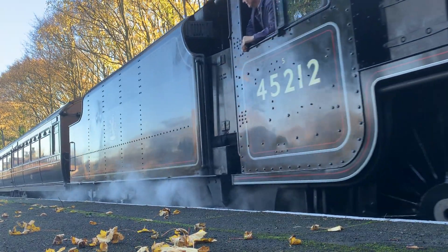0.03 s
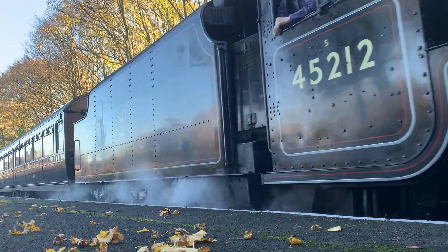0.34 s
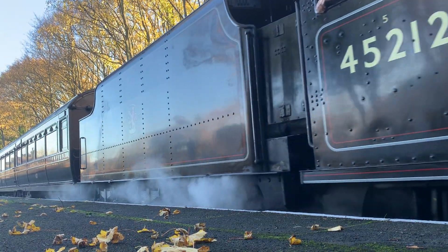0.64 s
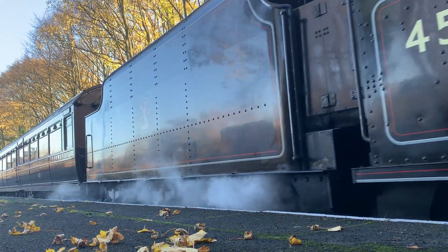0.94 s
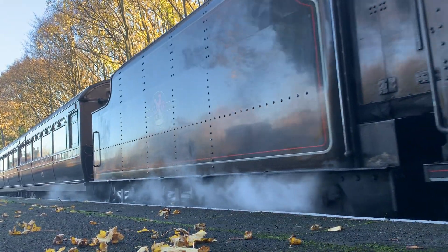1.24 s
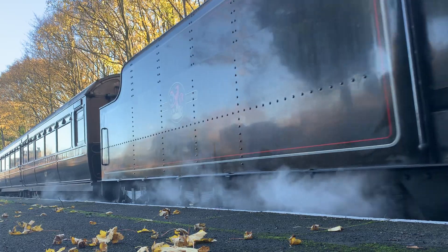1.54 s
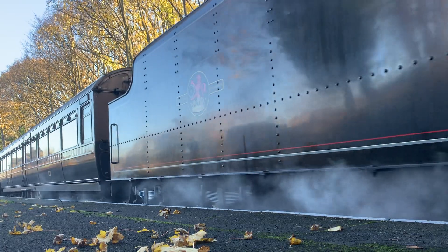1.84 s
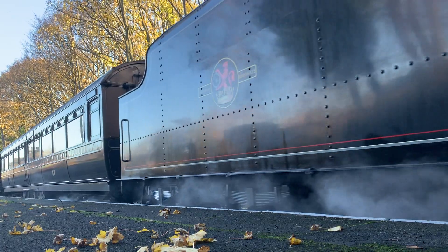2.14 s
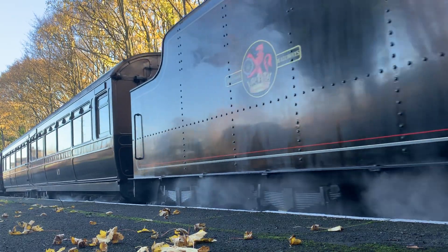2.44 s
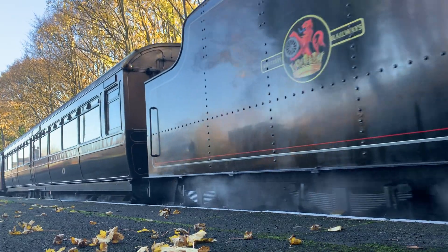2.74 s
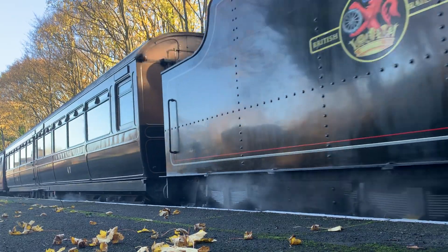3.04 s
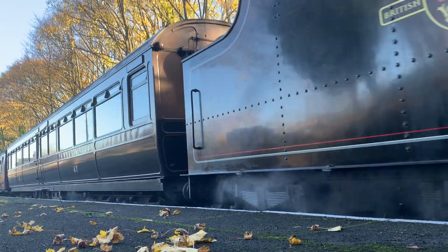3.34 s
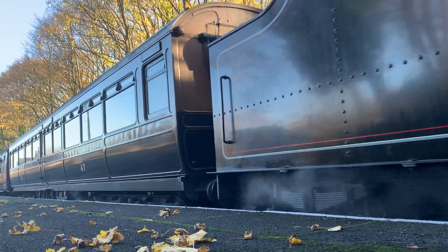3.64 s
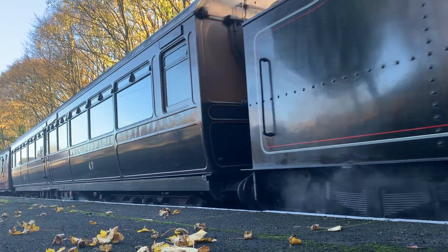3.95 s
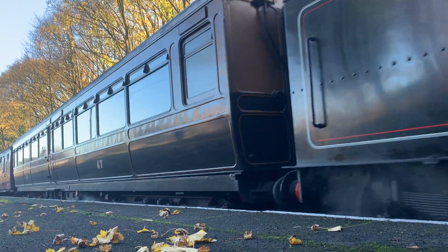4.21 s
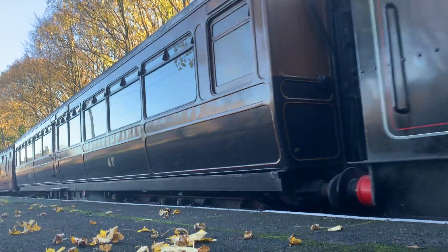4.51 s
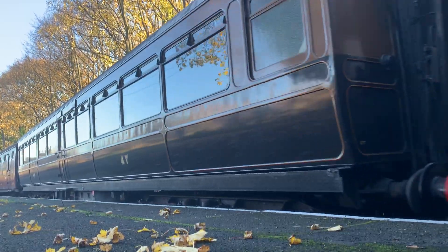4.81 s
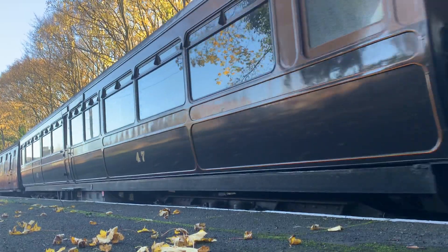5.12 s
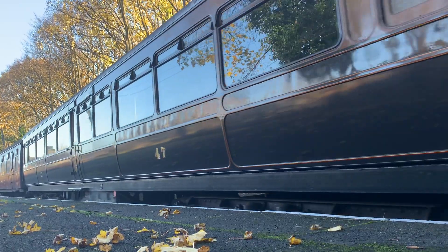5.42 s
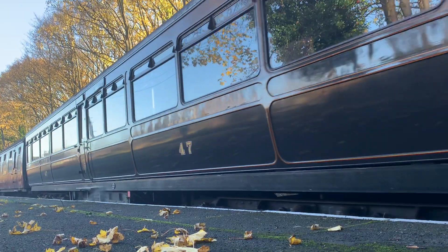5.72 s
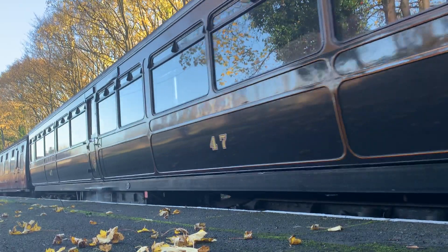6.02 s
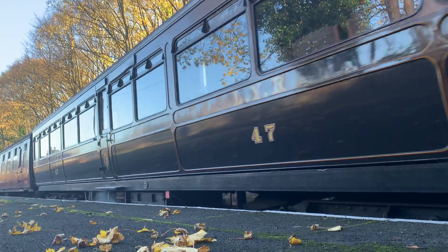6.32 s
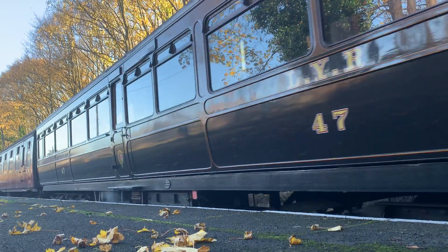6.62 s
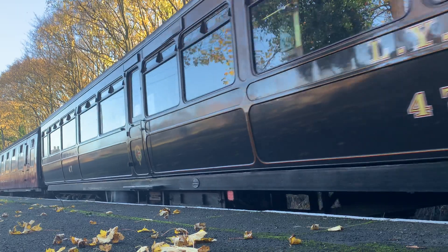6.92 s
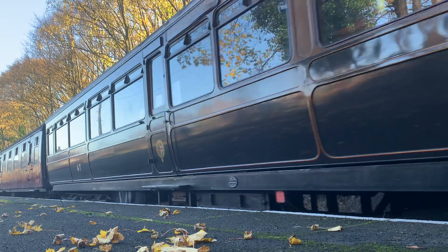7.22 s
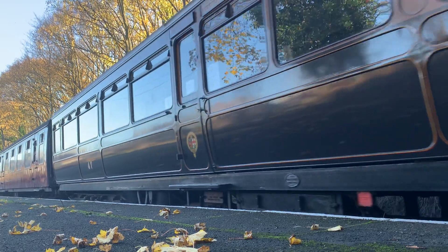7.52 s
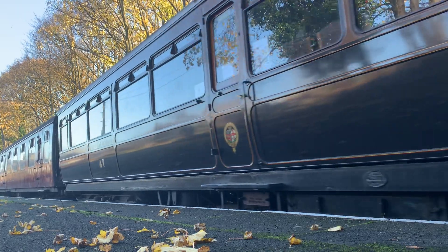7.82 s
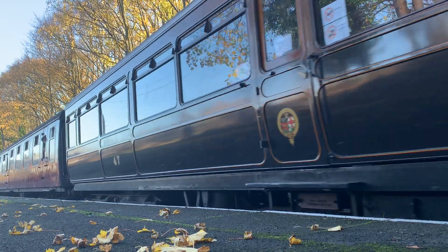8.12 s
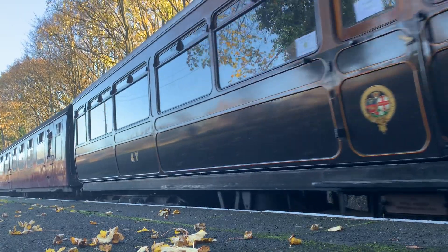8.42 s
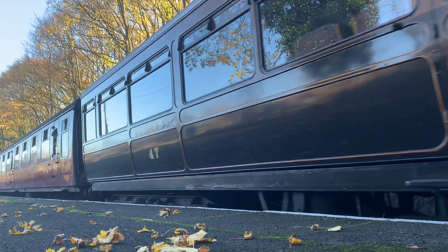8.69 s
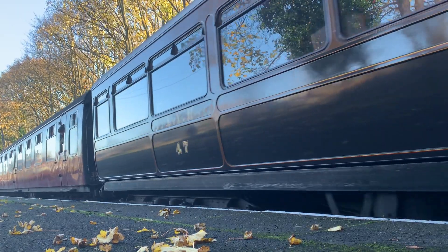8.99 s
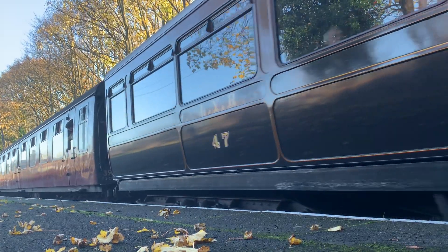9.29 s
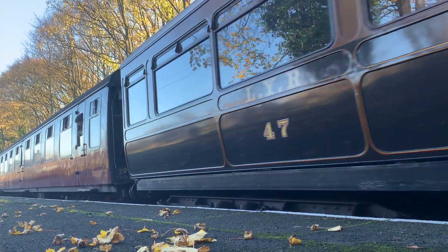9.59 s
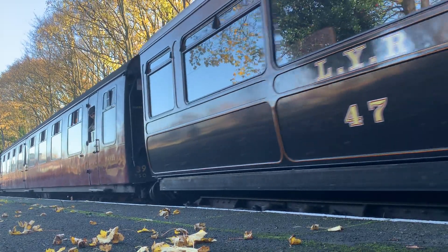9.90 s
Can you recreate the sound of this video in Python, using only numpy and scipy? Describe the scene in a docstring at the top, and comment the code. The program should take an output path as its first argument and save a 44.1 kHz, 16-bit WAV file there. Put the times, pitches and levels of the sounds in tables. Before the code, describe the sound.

A steam locomotive pulls past a microphone low on an outdoor platform, its deep, hollow chuffs gradually quickening and dulling as it moves away. Steam hisses strongly at first, then fades. Heavy wheels rumble throughout, with several steel clanks in the first half. Toward the end, the carriage wheels give short, high squeaks and a spring groans briefly.

```python
"""Steam locomotive leaving a station

The engine draws its carriages close past a listener low on the platform. Exhaust beats, turbulent
jets through the chimney, quicken as it moves away; leaking steam hisses by and fades behind the tender.
Wheels rumble, the running gear knocks, the first carriage's wheels squeak as steel slips on steel,
a spring groans, and the trees throw the beats back."""
import sys
import numpy as np
from scipy import signal
from scipy.fft import rfft, irfft, next_fast_len
from scipy.io import wavfile
from scipy.ndimage import uniform_filter1d, minimum_filter1d

SR = 44100
rng = np.random.default_rng(int(sys.argv[2]) if len(sys.argv) > 2 else 0)


def to_wav(s):
    """Save 16-bit WAV."""
    ch = np.atleast_2d(s).T  # columns
    pcm = np.round(np.clip(ch, -1, 1) * 32767)  # PCM
    wavfile.write(sys.argv[1], SR, pcm.astype(np.int16))


N = 438794
TIME = np.arange(N) / SR
HZ = np.fft.rfftfreq(N, 1 / SR)


# Chimney blast spectrum: f/Hz, density/dB
BLAST_SPECTRUM = [(25, -17), (40, -5), (65, 2), (130, -1.5), (260, -10.5), (450, -10.5), (620, -15.5),
                  (900, -10), (1600, -19), (2100, -22), (3000, -28), (4200, -31.5), (6500, -34.5),
                  (9500, -39.5)]
# Chimney and smokebox resonances and dips: f/Hz, width/Hz, lift/dB
CHIMNEY_MODES = [(68.3, 4, 5), (156, 22, -1), (214.5, 41, 8.5), (268, 20, 0), (313, 13.8, 8.5),
                 (393, 37, 4), (1230, 70, -1), (1410, 170, -4)]
# Exhaust beats: t/s, valve open/s, push/dB, thump/dB, bark/dB, rasp/dB,
# then f/Hz, lift/dB for each of four hollow notes (boom, low, middle, high)
EXHAUST_BEATS = [(-0.13, .14, -24.5, -21, -17, -25, 210, 3, 480, 10, 717, 22, 1230, 13),
                 (0.683, 0.11, -30, -17.5, -12, -24, 198, 5.5, 307, 6, 490, 8.5, 1180, 7),
                 (1.493, .14, -16, -17, -10, -22, 218, 3.5, 500, 7, 712, 4, 1240, 8),
                 (2.221, 0.13, -19.5, -19.5, -13, -21.5, 216, -2, 513, 7, 812, 5.5, 1765, 8.5),
                 (2.895, .15, -29.5, -20.5, -14.5, -29, 308.4, 8, 439, 7.5, 690, 13.5, 1644, 12.5),
                 (3.537, 0.1, -30.5, -14.5, -12.5, -23.5, 216, 5.5, 445, 10, 693, 9.5, 1247, 14.5),
                 (4.189, .11, -41, -21, -14, -26.5, 200, 8, 425, 12.5, 541, 9, 1300, 0),
                 (4.779, 0.14, -16, -20.5, -11.5, -24.5, 215.5, 9, 538, 7.5, 1030, 12, 1410, 12),
                 (5.357, .12, -22, -20, -15.5, -29.5, 221, 5.5, 300, 6, 398, 7.5, 1249, 3),
                 (5.914, .12, -23, -14.5, -14, -28.5, 217, 0, 508, 6, 707, 11, 1460, 12),
                 (6.482, 0.15, -26.5, -23, -16.5, -30.5, 201, -2.5, 483, 12, 719, 5.5, 1250, 6.5),
                 (7.009, .13, -15, -21, -12, -26.5, 216, -4, 460, 2, 903, 11, 1690, 7),
                 (7.518, .12, -24, -25.5, -16.5, -32.5, 216, 9.5, 410, 9, 799, -9, 1860, 6),
                 (8.021, .12, -17, -24, -13.5, -30, 215.4, 9, 326, 8, 720, 3, 1270, 12.5),
                 (8.526, .13, -21.5, -25, -16, -30.5, 213, 10.5, 392, 6.5, 711, 10, 1715, 7.5),
                 (8.999, .15, -20.5, -23, -14, -30.5, 216, 5, 242, 5, 724, 7.5, 2100, 6.5),
                 (9.456, .13, -17, -19.5, -19, -35, 217, 6, 393, -3, 712, 1, 1190, 4),
                 (9.91, 0.11, -12, -15.5, -21, -32, 198, 4, 358, 0, 710, 23.5, 1230, 2)]

def exhaust():
    """Turbulent chimney jet: a thump leads, then hollow bark, crackling rasp, bite and a deep push."""
    push_db, thump_db, bark_db, rasp_db = np.transpose(EXHAUST_BEATS)[2:6]
    modes_db = sum(db / (1 + (2 * (HZ - hz) / width_hz) ** 2) for hz, width_hz, db in CHIMNEY_MODES)
    colour = gain(spectrum_at(BLAST_SPECTRUM, HZ) + modes_db)
    # steadied so each beat's low push keeps its set strength
    push = steadied(noise(colour * band(32, 73)), amount=.55)
    thump = steadied(noise(colour * band(74.3, 150)), amount=.44)
    bark = bark_noise(colour)
    eddies = gain(1.14 * wander(130))
    rasp = unit_rms(noise(colour * band(1050, 1810)) * eddies)
    bite = unit_rms(noise(colour * band(1500, 4560)) * eddies)
    spray = unit_rms(noise(colour * band(2760, 7800)) * eddies)
    crack = unit_rms(noise(colour * band(1600, 3300)) * eddies ** 2)
    hard_beat = np.arange(len(EXHAUST_BEATS)) % 4 == 3  # once per wheel turn
    crack_db = np.where(hard_beat, rasp_db - 3.5, -120)
    push *= puffs(push_db, rise_s=.038, rise_power=.5, hold=1.11, sag_db=-3, t60_s=.35)
    thump *= puffs(thump_db, rise_s=.044, rise_power=.99, hold=1.13, sag_db=.8, t60_s=.35, lead_s=.009)
    bark *= puffs(bark_db - 1.25, rise_s=.054, rise_power=1.16, hold=.9, sag_db=1.5, t60_s=.42)
    rasp *= puffs(rasp_db + 1, rise_s=.075, rise_power=1.13, hold=.71, sag_db=-1, t60_s=.39)
    bite *= puffs(rasp_db - 2, rise_s=.056, rise_power=1.2, hold=.85, sag_db=5.5, t60_s=.28)
    spray *= puffs(rasp_db - .5, rise_s=.054, rise_power=1, hold=.9, sag_db=8, t60_s=.078)
    crack *= puffs(crack_db, rise_s=.048, rise_power=2, hold=.48, sag_db=0, t60_s=.16)
    return push + thump + bark + rasp + bite + crack + spray * gain(-1.47 * TIME)


def bark_noise(colour):
    """Hollow middle of the blast; dulls as the chimney moves away."""
    jet = noise(colour * band(134, 775))
    low = filtered(jet, band(1, 300))
    upper = steadied(jet - low, amount=.55, samples=2200)
    return steadied(low, amount=1, samples=2200) + upper * gain(2 - .33 * TIME)


def puffs(levels_db, rise_s, rise_power, hold, sag_db, t60_s, lead_s=0):
    """Beat envelopes: swell as the valve opens, sag for hold x its open time, die as it shuts."""
    power = np.zeros(N)
    for (beat_s, open_s, *_), db in zip(EXHAUST_BEATS, levels_db):
        start_s, held_s = beat_s - lead_s, hold * open_s
        active = (TIME > start_s) & (TIME < start_s + 1)
        t = TIME[active] - start_s
        swell = np.minimum(t / rise_s, 1) ** rise_power
        tilt_db = sag_db * (.5 - np.minimum(t / held_s, 1))
        decay_db = 60 * np.maximum(t - held_s, 0) / t60_s
        power[active] += (swell * gain(db + tilt_db - decay_db)) ** 2
    return np.sqrt(power)


def hollow_notes(blast, widths_hz=(18, 22, 24, 36), hold_s=.025, fade_s=.015):
    """Adds the ring between boiler, platform and bank: new notes each beat as the engine moves on."""
    start_s, open_s, *notes = np.array(EXHAUST_BEATS)[latest_row(EXHAUST_BEATS)].T
    overrun_s = TIME - start_s - open_s - hold_s
    drive = blast / (1 + np.exp(np.clip(overrun_s / fade_s, -40, 40)))
    return blast + sum((gain(lift_db) - 1) * resonate(drive, hz, width_hz)
                       for hz, lift_db, width_hz in zip(notes[::2], notes[1::2], widths_hz))


def train_reflections(x, share=.35, max_delay_s=.022, paths=5):
    """Adds reflections off the moving train: new paths each beat comb the sound above the bass."""
    upper, out = filtered(x, band(300, 20000)), x.copy()
    for delays_s in rng.uniform(.0947, 1, (paths, len(EXHAUST_BEATS))) * max_delay_s:
        emitted_s = TIME - delays_s[latest_row(EXHAUST_BEATS)]
        out += share * np.array([np.interp(emitted_s, TIME, side) for side in upper])
    return out


# Leak passing and leaving: t/s, level at 4-7 kHz/dB
LEAK_LEVEL = [(0.15, -33), (1.3, -32.5), (3.3, -38.5), (5.2, -42), (6.85, -47), (7.88, -51), (9.8, -56)]
# Spectra of the leak's hiss and top fizz: f/Hz, density/dB
HISS_SPECTRUM = [(150, -17), (500, 2.5), (800, 4), (1300, 2.5), (2200, 2.5), (3100, -3), (4000, -4.5),
                 (5500, -3), (7000, -6), (8400, -8.5), (10000, -15.5)]
FIZZ_SPECTRUM = [(7000, -30), (8500, -4), (9500, 0), (11000, -4), (13500, -8), (15200, -11)]

def steam_leak():
    """Steam sputters from under the cab; the top fizz is lost as it moves off."""
    steam = noise(gain(spectrum_at(HISS_SPECTRUM, HZ)), rms_band=band(3580, 7520))
    body = patchy(filtered(steam, band(100, 3300)), depth_db=2.1, bins=6, frames=9)
    edge = patchy(filtered(steam, band(3300, 8600)), depth_db=1.3, bins=10, frames=14)
    thinning_db = 3.4 * np.exp(-TIME / 2)  # while the jet faces the platform
    sputter_db = .5 * wander(25) + .6 * wander(200)
    body *= gain(sputter_db - thinning_db)
    fizz = noise(gain(spectrum_at(FIZZ_SPECTRUM, HZ)) * band(5800, 20000)) * gain(-8.5 - 2.6 * TIME)
    flutter_db = .3 * wander(11)
    return (body + edge + fizz) * gain(timeline(LEAK_LEVEL) - leak_dip_db() + flutter_db)


def leak_dip_db(depth_db=5, delay_s=.24, width_s=.088, until_s=2.85):
    """While the engine is near, the leak slackens after each beat empties a cylinder."""
    dips = sum(np.exp(-((TIME - beat_s - delay_s) / width_s) ** 2)
               for beat_s, *_ in EXHAUST_BEATS if beat_s > 0)
    return depth_db * dips / (1 + (TIME / until_s) ** 10)


# Rolling train, loudest as wheels pass: t/s, rumble/dB, roar/dB
ROLLING_LEVELS = [(.15, -24, -27), (.42, -21.5, -26.5), (.95, -30, -28), (1.4, -35, -30), (2.1, -25, -32.5),
                  (3.8, -28.5, -30.5), (4.08, -20, -31.5), (4.55, -27.5, -30.5), (6.4, -25, -35),
                  (7.4, -23.5, -30.5), (8.3, -29, -32), (9.85, -28, -31.5)]
# Spectra of track rumble and wheel roar: f/Hz, density/dB
RUMBLE_SPECTRUM = [(10, -27), (25, -18), (40, -5.5), (58, 10), (72, 1.5), (95, 6.5), (130, -19),
                   (200, -19.5), (400, -68)]
ROAR_SPECTRUM = [(70, 5.5), (150, 2), (230, 1), (430, -3.5), (620, -10), (1000, -13.8), (1600, -19),
                 (2600, -26), (4500, -34), (9000, -93)]

def rolling_wheels():
    """Heavy wheels shake the track and roar unevenly on the rails."""
    shake = noise(gain(spectrum_at(RUMBLE_SPECTRUM, HZ)))
    sprung = np.tanh(.3 * shake)  # springs even out the biggest surges
    rumble = unit_rms(filtered(sprung, band(12, 156))) * gain(timeline(ROLLING_LEVELS))
    roar = noise(gain(spectrum_at(ROAR_SPECTRUM, HZ)) * band(36, 8000), rms_band=band(200, 900))
    roar = patchy(roar, depth_db=1.8, bins=3, frames=20)
    roar_db = timeline(ROLLING_LEVELS, column=2) - 1.5 + .15 * wander(12.5)
    return rumble + roar * gain(roar_db)


# Steel frame resonances: f/Hz, width/Hz, level/dB
FRAME_MODES = [(230, 62, 1), (410, 47, 8), (543, 35, 8), (670, 32, 8.5), (950, 11, 11), (1220, 470, -0.5),
               (2200, 1500, -16.5)]
# Running gear knocks: t/s, level/dB, strongest ring/Hz
GEAR_KNOCKS = [(0.312, -26, 1080), (0.559, -22.5, 520), (1.729, -27, 378), (2.075, -31, 860),
               (2.557, -29.5, 385), (4.001, -30, 950), (4.42, -36, 655), (7.29, -39, 960)]

def gear_knocks(rise_s=.009, t60_s=.29, clack_s=.022):
    """Slack in rods and couplings closes: a steel clack, then the frames rattle, most on one note."""
    frame_power = sum(gain(2 * db) / (1 + (2 * (HZ - hz) / width_hz) ** 2)
                      for hz, width_hz, db in FRAME_MODES)
    blows, contact = np.zeros((2, N))
    for start_s, db, _ in GEAR_KNOCKS:
        t = TIME - start_s
        blows += np.clip(t / rise_s, 0, 1) * gain(db - 60 * np.maximum(t, 0) / t60_s)
        contact += (t > 0) & (t < clack_s)
    rattle = gain(4.5) * noise(np.sqrt(frame_power) * band(130, 3700)) * blows
    clack = gain(-2.5) * noise(band(1300, 3200)) * blows * uniform_filter1d(contact, size=90)
    ring_hz = np.array(GEAR_KNOCKS)[latest_row(GEAR_KNOCKS), 2]
    return clack + rattle + gain(-1) * resonate(rattle, ring_hz, width_hz=45)


# Carriage wheel squeaks: t/s, length/s, f/Hz, glide/share of f, level/dB, roughness/share of f
WHEEL_SQUEAKS = [(6.36, 0.069, 9000, -.011, -66, .008), (6.84, .08, 6760, 0, -58, .006),
                 (6.88, .09, 9200, .02, -63, .015), (7.42, .049, 8340, .04, -55, .012),
                 (7.445, .074, 9200, .014, -61, .01), (7.9, .12, 8900, 0, -54, 0.014),
                 (8.16, .15, 8280, -.015, -51, .009), (8.2, .09, 9200, .03, -70, .012),
                 (8.318, 0.082, 7600, 0.068, -47, 0.04), (8.372, 0.054, 8700, 0.074, -55, 0.018),
                 (8.418, .04, 9900, 0.21, -56, .008), (8.74, 0.032, 9150, .06, -48, .006),
                 (8.765, .028, 9400, .06, -48, .006), (8.79, 0.036, 8280, -0.0022, -46, 0.0054),
                 (8.822, 0.035, 9250, .05, -54, .008), (8.825, 0.048, 8300, 0, -48, .006),
                 (8.85, .028, 9600, 0.091, -54, .006), (8.872, 0.031, 9300, .01, -57, .012),
                 (8.955, .052, 9050, .08, -51, .0045), (9.195, 0.052, 8270, -0.023, -44, 0.025),
                 (9.226, 0.046, 8100, .13, -35.5, .018), (9.254, 0.022, 6780, 0, -40, .005),
                 (9.262, 0.044, 8330, .01, -50, .01), (9.25, .15, 9140, -0.081, -55.5, .013),
                 (9.37, .035, 11150, 0, -65, .004), (9.666, 0.036, 8830, .025, -43, .016),
                 (9.69, 0.044, 7770, -0.0087, -36, .008), (9.708, .03, 8500, -.05, -53, .04),
                 (9.732, 0.056, 7940, .018, -48, .008)]

def wheel_squeaks():
    """Carriage wheels sing and squeak on the rail; the trees answer."""
    squeal = flange_squeal() + stick_slip(WHEEL_SQUEAKS)
    return gain(1.5) * squeal + gain(-9) * tree_echoes(squeal)


def stick_slip(rows):
    """Steel sticks and slips on steel: short, unsteady glides."""
    out = np.zeros((2, N))
    jitter, grip = wander(650), gain(2.2 * wander(130))
    for start_s, length_s, centre_hz, glide, db, roughness in rows:
        at = np.flatnonzero((TIME > start_s) & (TIME < start_s + length_s))
        hz = centre_hz * (1 + glide * np.linspace(-.5, .5, len(at))) * (1 + roughness * jitter[at])
        envelope = gain(db) * grip[at] * signal.windows.tukey(len(at), .6)
        out[:, at] += np.sqrt(2) * sine_pair(hz) * envelope
    return out


# Flange contact: t/s, level/dB
FLANGE_LEVEL = [(4.3, -75), (5.2, -63), (6.5, -63), (7.6, -66), (8.3, -62), (9.3, -64), (9.9, -72)]
# Flange notes: f/Hz, level/dB
FLANGE_NOTES = [(8270, -5), (9080, 0)]

def flange_squeal(waver=.009, roughness=.012):
    """Thin, wavering squeal that catches and lets go as flanges touch the rail."""
    squeal = np.zeros((2, N))
    for centre_hz, db in FLANGE_NOTES:
        hz = centre_hz * (1 + waver * wander(12) + roughness * wander(650))
        touch = np.clip(2 * (wander(6) - .5), 0, 1) * gain(2 * wander(60))
        squeal += gain(db) * touch * sine_pair(hz)
    return squeal * gain(timeline(FLANGE_LEVEL))


# Spring groans: t/s, length/s, level/dB
SPRING_GROANS = [(8.34, .105, -43.5), (8.47, .075, -44)]

def spring_groans(hz=1120, roughness=.012):
    """A carriage spring groans straight ahead, alike in both channels; the trees answer."""
    rows = [(start_s, length_s, hz, 0, db, roughness) for start_s, length_s, db in SPRING_GROANS]
    groan = stick_slip(rows)[:1]
    return groan + gain(-8) * tree_echoes(groan)


# Reverberation of the cutting and trees: f/Hz, T60/s
ECHO_DECAY = [(60, 0.5), (250, 0.96), (1000, 0.45), (3000, 0.18), (10000, 0.23)]

def tree_echoes(x, density=.05, predelay_s=.02):
    """Scattered echoes, each band dying at its own rate."""
    taps = rng.standard_normal((2, SR)) * (rng.random((2, SR)) < density) * (TIME[:SR] > predelay_s)
    hz, t, spectra = signal.stft(taps, SR, nperseg=256)
    decay = gain(-60 * t / spectrum_at(ECHO_DECAY, hz)[:, None])
    tail = signal.istft(spectra * decay, SR, nperseg=256)[1]
    return signal.fftconvolve(x, tail / np.linalg.norm(tail[0]), axes=1)[:, :N]


# Phase between the two microphone ports: f/Hz, left lead/rad
STEREO_PHASE = [(10, 0), (60, -.4), (110, -.85), (150, -1.35), (200, -2), (300, -2.4), (450, -2.8),
                (800, -3), (1300, -3.05), (1800, -4.05), (2700, -6.1), (4200, -9.4), (6200, -14),
                (13500, -26.2)]
# Their coherence at spread 1: f/Hz, coherence/0-1
STEREO_COHERENCE = [(60, 0.99), (110, 0.98), (180, 0.93), (500, 0.87), (1300, 0.91), (2000, 0.83),
                    (3200, 0.85), (4300, 0.54), (8000, 0.041), (11000, 0.48)]
# Their balance: f/Hz, left minus right/dB
STEREO_BALANCE = [(60, -1.5), (150, 0), (205, -4), (300, -2), (1000, -2.5), (2800, -0.8), (4800, .5),
                  (6300, -0.5), (8300, -5), (9500, -0.5), (14000, 0)]

def microphone_ports(pair, spread):
    """The left port hears each sound later and partly unlike the right; wide sources are less alike."""
    right, unrelated = rfft(pair)
    coherence = spectrum_at(STEREO_COHERENCE, HZ) ** spread
    left = coherence * right + np.sqrt(1 - coherence ** 2) * unrelated
    left *= np.exp(1j * spectrum_at(STEREO_PHASE, HZ))
    lean = gain(spectrum_at(STEREO_BALANCE, HZ) / 2)
    return irfft(np.array([left * lean, right / lean]), N)


def gain(db):
    """Decibels to amplitude."""
    return 10 ** (np.asarray(db) / 20)


def unit_rms(x):
    """Scales to rms 1."""
    return x / np.sqrt(np.mean(x ** 2) + 1e-20)


def spectrum_at(table, hz):
    """Interpolates a table on a log-frequency axis."""
    table_hz, values = np.transpose(table)
    return np.interp(np.log(hz + 1), np.log(table_hz + 1), values)


def timeline(table, column=1):
    """Interpolates one column of a time table at every sample."""
    columns = np.transpose(table)
    return np.interp(TIME, columns[0], columns[column])


def latest_row(events):
    """Index of the latest event at every sample."""
    return np.maximum(np.searchsorted(np.array(events)[:, 0], TIME) - 1, 0)


def band(lo_hz, hi_hz):
    """Gain of a steep band-pass."""
    return 1 / np.sqrt((1 + (lo_hz / (HZ + 1)) ** 12) * (1 + (HZ / hi_hz) ** 12))


def filtered(x, response):
    """Zero-phase filter."""
    return irfft(rfft(x) * response, N)


def resonate(x, hz, width_hz):
    """Unity-gain resonance following the curve hz."""
    carrier = np.exp(2j * np.pi * np.cumsum(hz) / SR)
    pole = np.exp(-np.pi * width_hz / SR)
    return 2 * (carrier * signal.lfilter([1 - pole], [1, -pole], x / carrier)).real


def sine_pair(hz):
    """Two sines of random phase following the curve hz."""
    return np.sin(2 * np.pi * (np.cumsum(hz) / SR + rng.random((2, 1))))


def white_spectra(channels):
    """One white noise spectrum per channel."""
    return rng.standard_normal((channels, len(HZ))) + 1j * rng.standard_normal((channels, len(HZ)))


def noise(colour, rms_band=1):
    """Two independent noises of one colour, rms 1 within rms_band."""
    spectra = white_spectra(2) * colour
    return irfft(spectra, N) / np.sqrt(np.mean(abs(spectra * rms_band) ** 2) / N)


def wander(rate_hz):
    """Smooth random curve, rms 1, up to about rate_hz."""
    return unit_rms(irfft(white_spectra(1)[0] * np.exp(-(HZ / rate_hz) ** 2), N))


def steadied(x, amount, samples=1):
    """Evens out the random swells of a narrow noise; amount 0-1."""
    envelope = uniform_filter1d(abs(signal.hilbert(x, next_fast_len(N))[:, :N]), samples)
    return x.std() * unit_rms(x / (envelope + .2 * envelope.mean()) ** amount)


def patchy(x, depth_db, bins, frames):
    """Lifts and drops random patches of the spectrogram, as eddies do."""
    spectra = signal.stft(x, nperseg=1024, noverlap=768)[2]
    patches = uniform_filter1d(rng.standard_normal(spectra.shape[1:]), bins, axis=0)
    patches = unit_rms(uniform_filter1d(patches, frames, axis=1))
    return signal.istft(spectra * gain(depth_db * patches), nperseg=1024, noverlap=768)[1][:, :N]


def scene():
    """The far chimney; steam, wheels and a spring close by."""
    beats = train_reflections(hollow_notes(exhaust()))
    squeaks = wheel_squeaks()
    far = beats + gain(-20) * tree_echoes(beats)
    near = steam_leak() + rolling_wheels() + gear_knocks() + squeaks
    return microphone_ports(far, spread=1) + microphone_ports(near, spread=2.4) + spring_groans()


def record(dry):
    """Fast peak limiter, brief end fades, low-pass."""
    ceiling, cutoff_hz = .95, 15200
    safe_gain = np.minimum(ceiling / (abs(dry).max(axis=0) + 1e-9), 1)
    limited = dry * uniform_filter1d(minimum_filter1d(safe_gain, size=600), size=500)
    faded = limited * signal.windows.tukey(N, .0006)
    lowpass = signal.firwin(511, cutoff_hz, window=("kaiser", 9), fs=SR)
    return signal.oaconvolve(faded, lowpass[None], "same")


dry = scene()
out = record(dry)
to_wav(out)
```